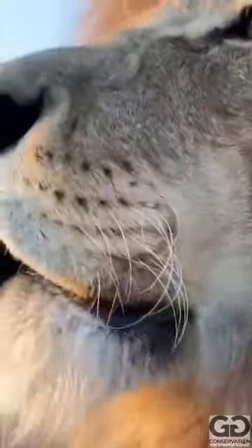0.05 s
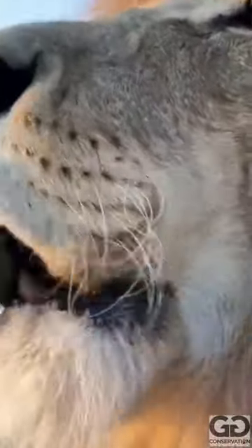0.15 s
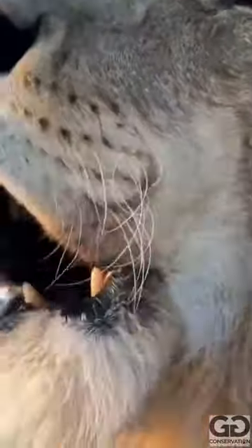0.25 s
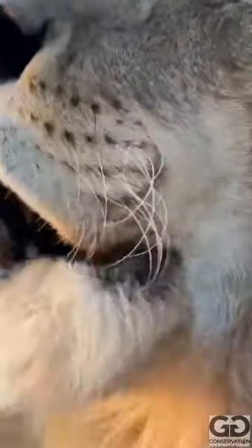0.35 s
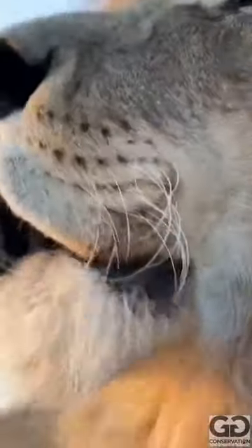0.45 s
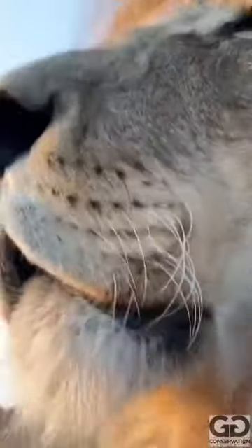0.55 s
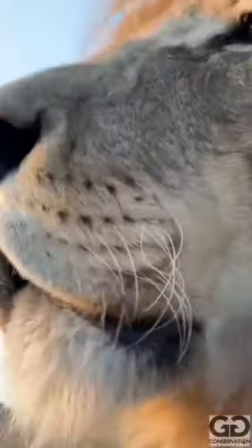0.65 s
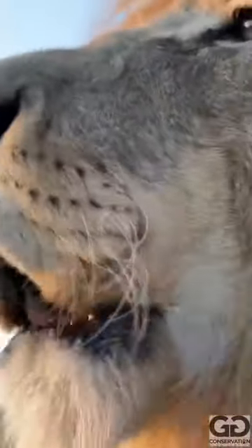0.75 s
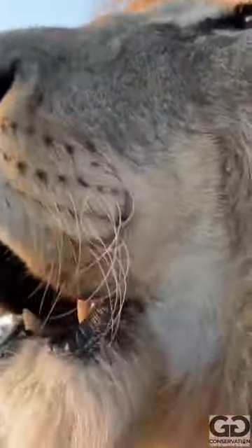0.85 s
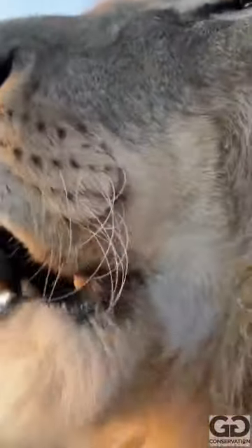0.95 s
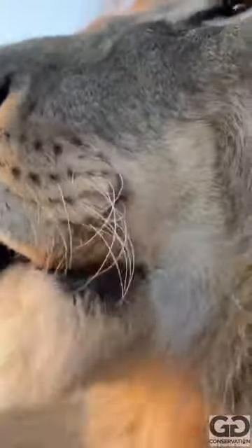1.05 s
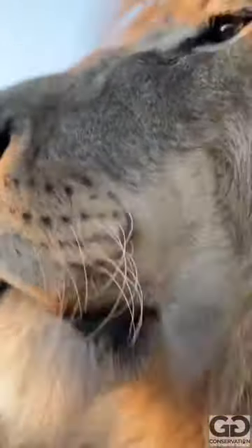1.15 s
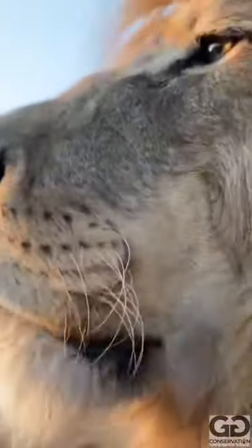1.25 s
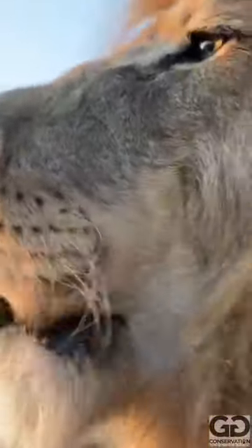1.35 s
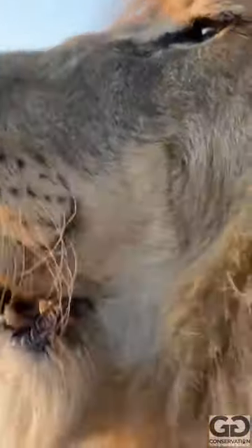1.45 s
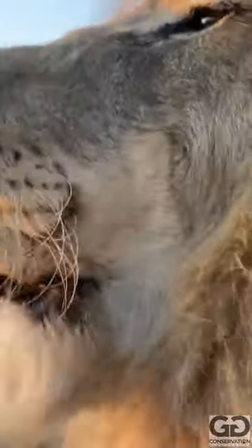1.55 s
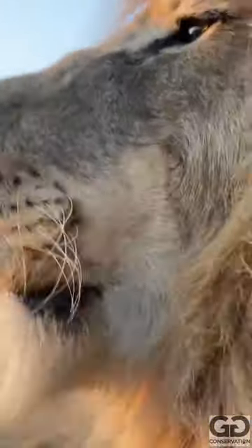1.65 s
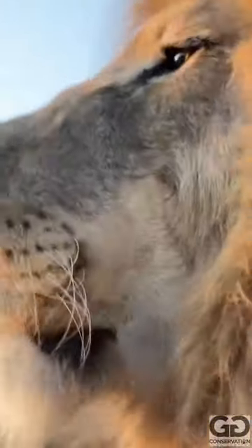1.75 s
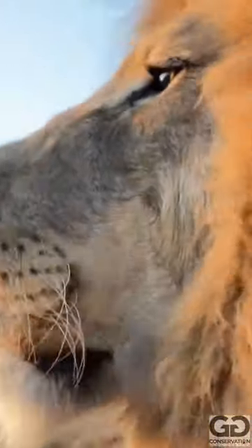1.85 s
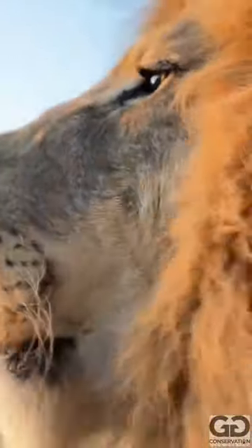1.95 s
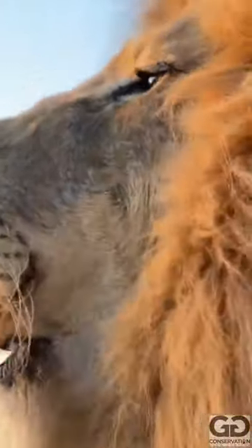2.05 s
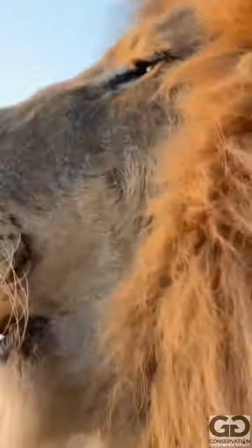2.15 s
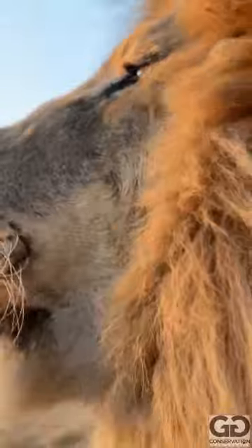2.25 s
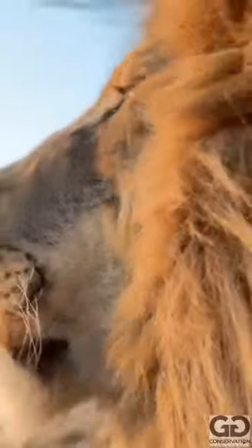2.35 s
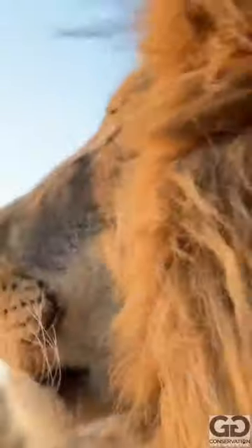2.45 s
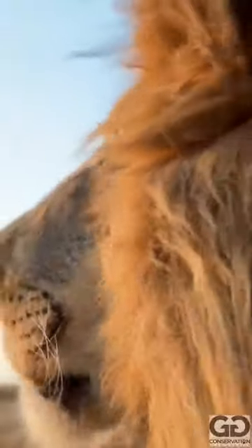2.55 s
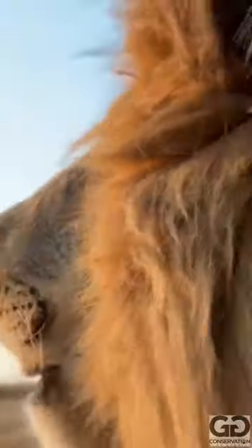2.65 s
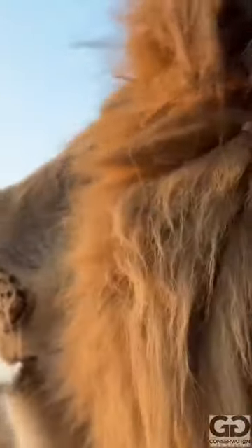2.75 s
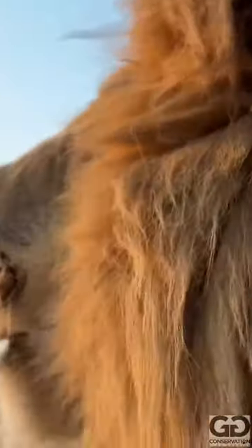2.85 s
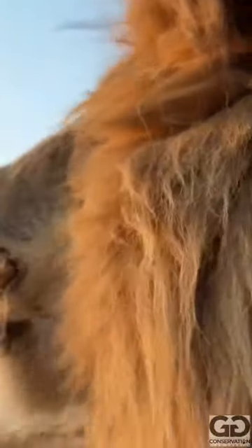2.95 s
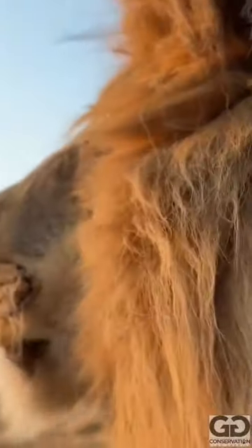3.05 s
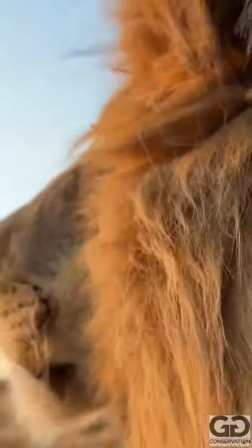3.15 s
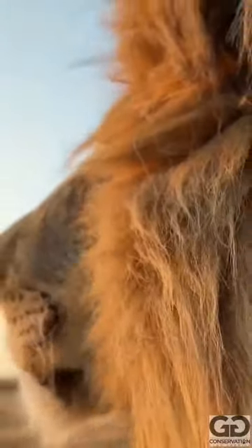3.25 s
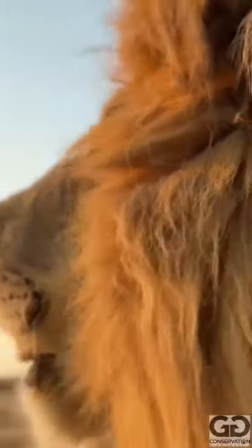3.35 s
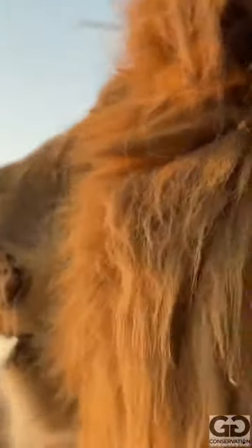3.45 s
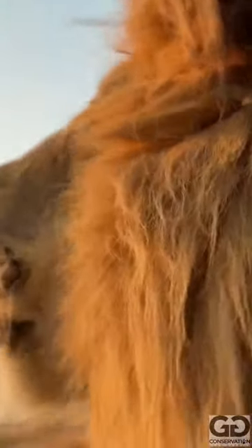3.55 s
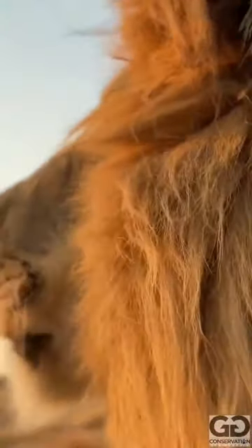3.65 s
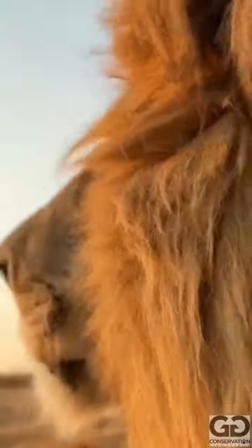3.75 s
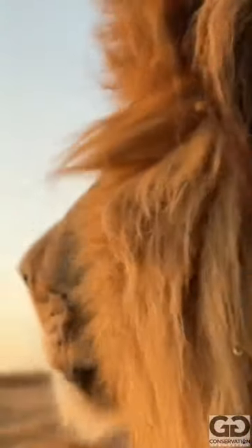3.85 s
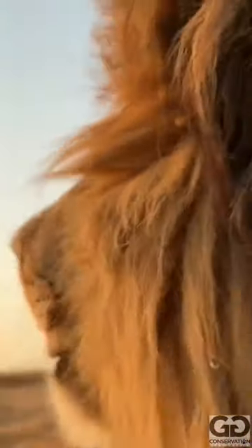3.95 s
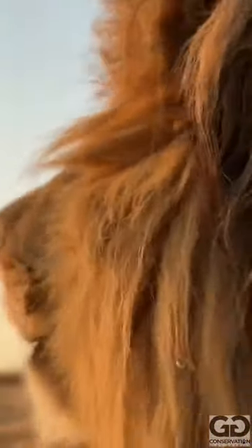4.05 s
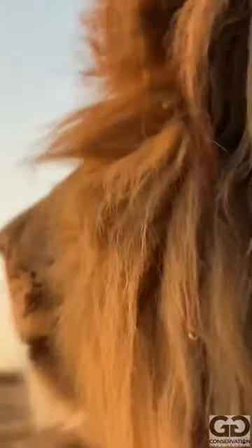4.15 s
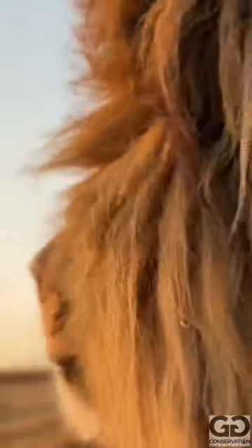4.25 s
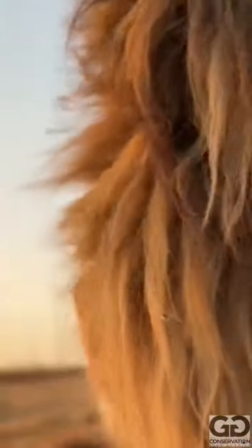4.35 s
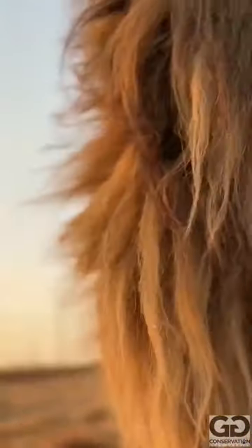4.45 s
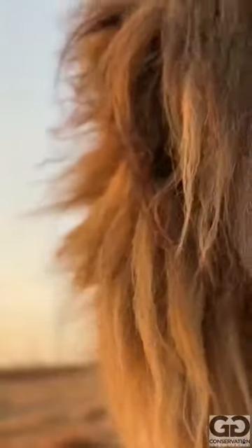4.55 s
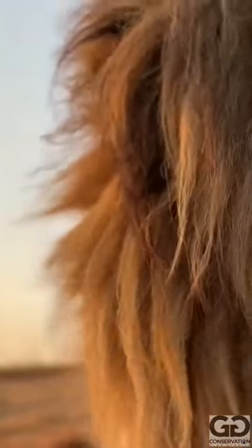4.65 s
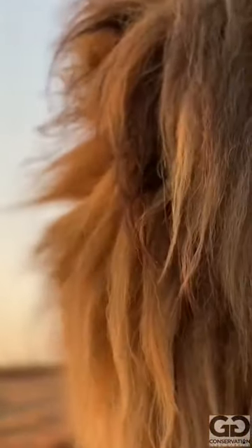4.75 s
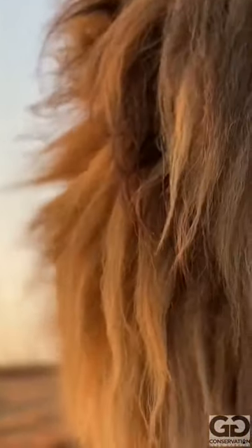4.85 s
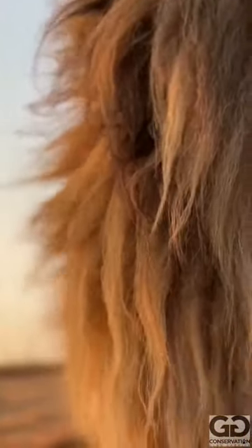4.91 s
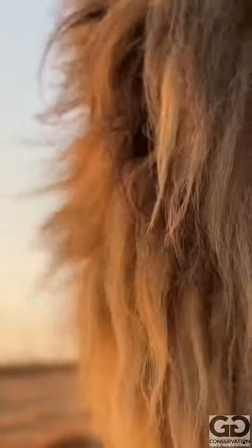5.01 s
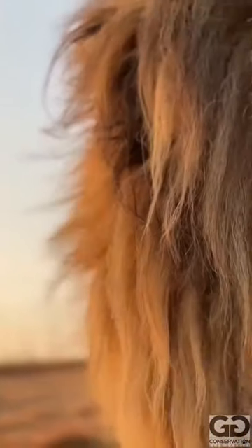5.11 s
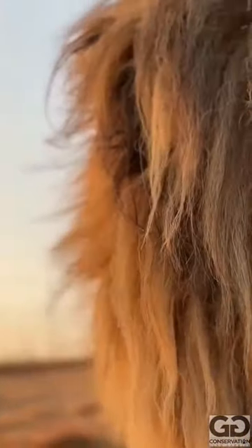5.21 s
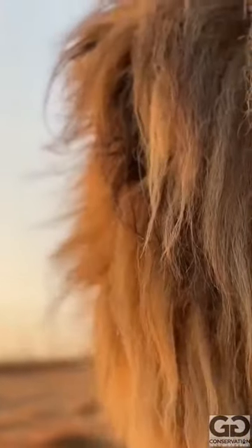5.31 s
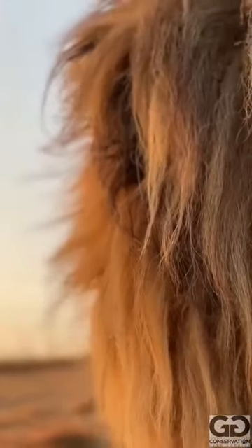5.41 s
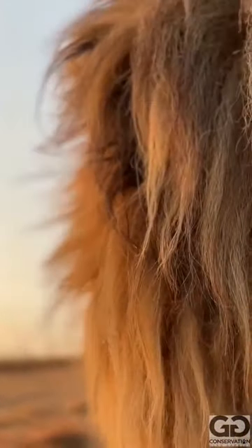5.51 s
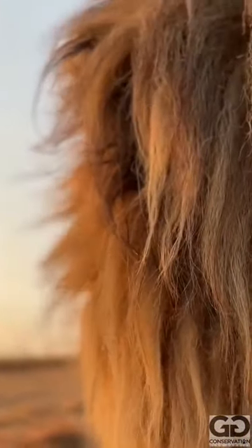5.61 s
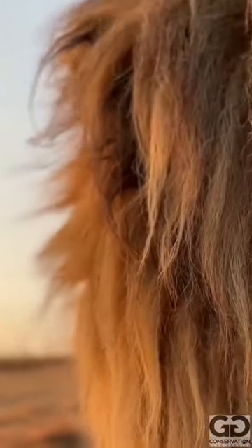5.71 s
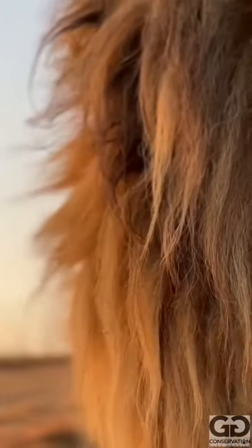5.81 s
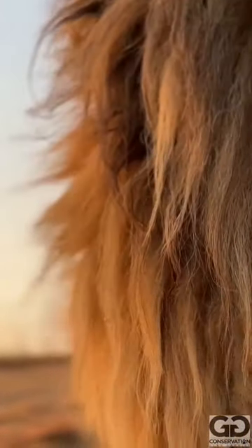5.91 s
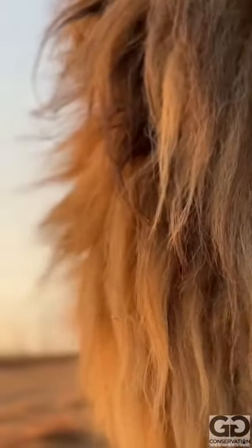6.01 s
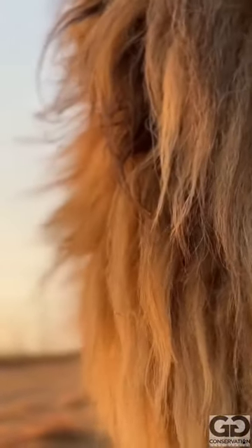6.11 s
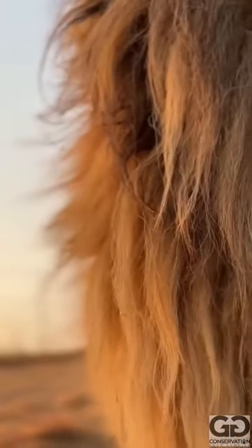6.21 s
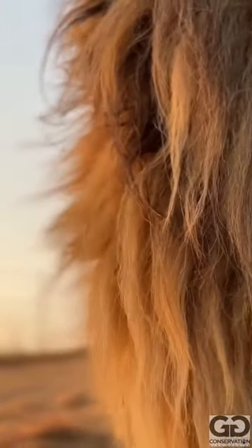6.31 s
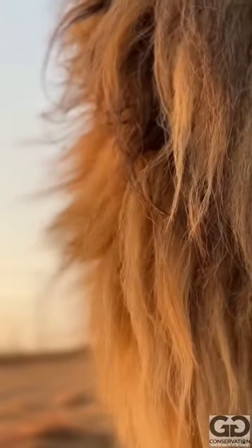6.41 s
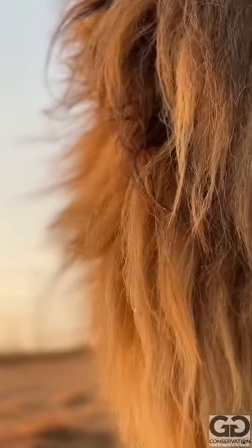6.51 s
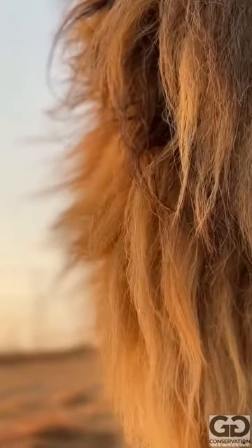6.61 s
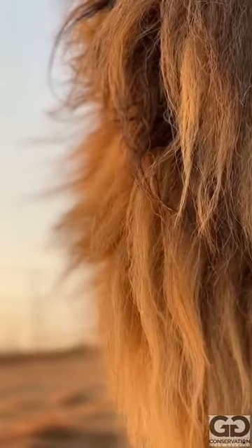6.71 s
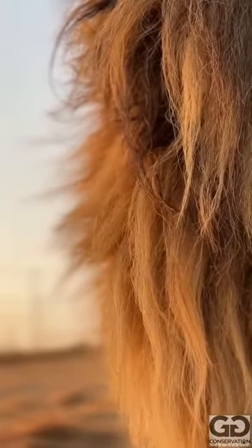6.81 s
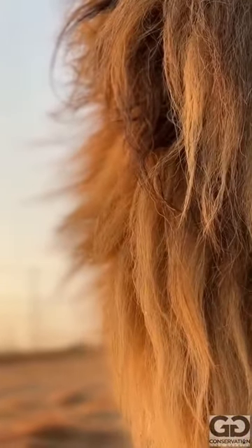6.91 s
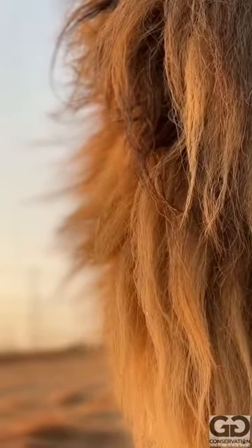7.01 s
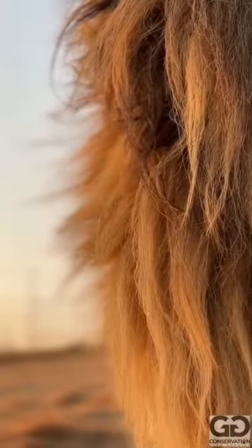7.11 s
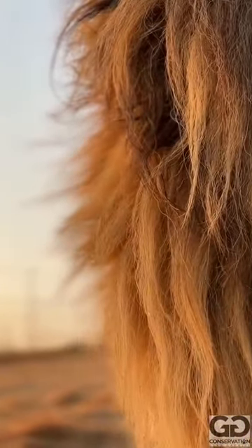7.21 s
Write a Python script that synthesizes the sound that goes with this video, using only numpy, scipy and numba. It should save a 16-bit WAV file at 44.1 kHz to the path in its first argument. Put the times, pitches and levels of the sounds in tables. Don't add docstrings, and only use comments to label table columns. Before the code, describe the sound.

A male lion very close gives ten deep, rough grunting roars with gasps between, then faint low moans far off on a quiet plain.

```python
import sys
import numpy as np
from scipy import signal
from scipy.fft import rfft, irfft, next_fast_len
from scipy.io import wavfile
from scipy.ndimage import uniform_filter1d, map_coordinates
from numba import njit

SR = 44100
rng = np.random.default_rng(int(sys.argv[2]) if len(sys.argv) > 2 else 0)


def digitize_waveform(pressure):
    field = np.atleast_2d(pressure).T
    bounded = np.clip(field, -1, 1)
    quanta = np.round(bounded * 32767).astype(np.int16)
    wavfile.write(sys.argv[1], SR, quanta)


def gain_from_db(level_db):
    decades = np.asarray(level_db, float) / 20
    return 10 ** decades


N = 320607


def unit(x):
    return x / np.sqrt(np.mean(x ** 2) + 1e-20)


def noise():
    return rng.standard_normal(N)


def curves(tables):
    t = np.arange(N) / SR
    s, *cols = np.transpose(np.concatenate(tables))
    gate = sum((t >= rows[0][0]) & (t < rows[-1][0]) for rows in tables)
    return [np.interp(t, s, c) for c in cols] + [uniform_filter1d(1. * gate, size=400, mode="nearest")]


def wobble(rate):
    knots = rng.standard_normal(int(N * rate / SR) + 4)
    return map_coordinates(knots, [np.arange(N) * rate / SR])


def filtered(x, response):
    m = next_fast_len(N + SR // 2)
    return irfft(rfft(x, m) * response(np.fft.rfftfreq(m, 1 / SR)), m)[:N]


def coloured(x, points):
    f, db = np.transpose(points)
    return unit(filtered(x, lambda hz: gain_from_db(np.interp(np.log(hz + 1), np.log(f), db, -120, -120))))


def resonant(x, modes):
    def response(f):
        total = 0
        for k, (c, w, db) in enumerate(modes):
            total = total + (-1) ** k * gain_from_db(db) * 1j * f * w / (c * c - f * f + 1j * f * w)
        return total
    return unit(filtered(x, response))


@njit
def follow(x, pole):
    y, state = np.zeros(len(x)), 0j
    for n in range(len(x)):
        state = state * pole[n] + x[n]
        y[n] = state.imag
    return y


def moving(x, hz, width_hz):
    return unit(follow(x, np.exp((2j * hz - width_hz) * np.pi / SR)))


# time in seconds, level in dB.
RUMBLE_LEVEL = [
    (0, -52.5),
    (.9, -61),
    (1.3, -62),
    (3, -60),
    (5.3, -57),
    (6.3, -54),
    (7.27, -59.5),
]
# frequency in Hz, level in dB.
RUMBLE_TONE = [(15, -36.5), (25, 1.5), (76, 12), (131, 2), (246, -26.5), (379, -42), (454, -21.5),
               (653, -35), (700, -16), (910, -57), (1540, -120)]
# frequency in Hz, level in dB.
AIR_TONE = [(120, -37), (200, -8.5), (327, -7.5), (392, -14.5), (487, -23.5), (1060, -23.5), (2010, -32),
            (2640, -38.5), (3000, -35), (15400, -61)]


def plain():
    level_db, _ = curves([RUMBLE_LEVEL])
    hum = moving(noise(), np.full(N, 115.), width_hz=11)
    rumble = gain_from_db(level_db + 2.1 * wobble(6)) * (coloured(noise(), RUMBLE_TONE) + 0.33 * hum)
    lift_db = np.interp(np.arange(N) / SR, [0, 6.1, 6.5, 7.15, 7.27], [-76.0, -75.0, -72, -68.0, -67.5])
    return rumble + gain_from_db(lift_db + 1.2 * wobble(14)) * coloured(noise(), AIR_TONE)


# start in seconds, length in seconds, chest level in dB, throat level in dB, pitch in Hz.
GRUNTS = [
    (-.24, 0.36, -8, -8, 116),
    (0.336, 0.34, -10, -13, 114),
    (0.947, 0.35, -10, -15, 114),
    (1.557, 0.33, -11, -11.5, 119),
    (2.172, 0.37, -11.5, -16, 121),
    (2.873, 0.43, -9, -16.5, 117),
    (3.535, .365, -6, -13, 110),
    (4.133, 0.33, -9, -15, 109),
    (4.834, 0.41, -8.5, -15, 106),
    (5.812, 0.54, -8, -13, 97.9),
]
# time in seconds, throat peak in dB, jaw ring in Hz.
BREAKS = [
    (.035, -39.5, 1120),
    (.463, -5.5, 1120),
    (1.082, -3, 1110),
    (1.665, -5, 855),
    (2.308, -7, 1117),
    (3.033, -6, 1076),
    (3.653, -5, 1113),
    (4.235, -3.5, 743.5),
    (4.996, -9.5, 949),
    (5.904, -3.5, 775),
]
FULL_S, SAG_AT = .07, .68


def falter_lead(s):
    return 0.021 + 0.00078 * s


def effort():
    tables = []
    for (s, length, chest_db, throat_db, _), (break_s, *_) in zip(GRUNTS, BREAKS):
        hold_s = np.clip(break_s - 0.021 - s, FULL_S + .005, length / 2)
        times = s + np.array([0, 0.036, FULL_S, hold_s, SAG_AT * length, length])
        rise = np.array([-24.5, -5, 0, 0, 0, 0])
        fall = np.array([0, 0, 0, 0, -12.5, -54])
        throat = throat_db + rise
        mouth = throat - 7.5 - 0.34 * s + 2.2 * fall
        rasp = throat - 17 - 1.41 * s + 1.65 * fall
        tables.append(np.transpose([times, chest_db + rise + fall, throat + 2 * fall, mouth, rasp]))
    return curves(tables)


THROAT_HZ = (368.6, 408.2, 352, 303)


def tract():
    tables = []
    for s, length, *_, hz in GRUNTS:
        times = s + np.array([0, FULL_S, SAG_AT * length, length])
        tables.append(np.transpose([times, hz * np.array([.93, 1, 1.01, .98]), THROAT_HZ]))
    return curves(tables)[:2]


# frequency in Hz, width in Hz, level in dB.
MOUTH = [(744, 20, -2.5), (861, 72, 1), (988.6, 48, 1.5), (1110, 60, 2), (1276, 58, -6)]
# frequency in Hz, level in dB.
RASP_TONE = [(760, -34.5), (1300, -3), (1550, -7.5), (1850, -6), (2440, -7.5), (3230, -12), (3970, -19),
             (4790, -21.5), (5710, -19), (6070, -20.5), (9090, -28.5), (11800, -26.5), (15400, -48)]


def buzz():
    chest_db, throat_db, mouth_db, rasp_db, gate = effort()
    pitch, throat_hz = tract()
    t = np.arange(N) / SR
    turns = np.cumsum(pitch * (1 + .05 * wobble(70))) / SR
    closing = np.diff(np.floor(turns), prepend=0)
    pulses = unit(closing * gain_from_db(1.1 * noise()))
    puff = 0.58 + np.exp(-3.2 * (turns % 1))

    def air():
        return unit(puff * noise())

    tone = np.sqrt(2) * np.sin(2 * np.pi * turns) * gain_from_db(2.2 * wobble(43))
    flutter = coloured(noise(), [(25, -20.0), (45, -6.0), (70, -1.5), (140, -1.0), (200, -12), (260, -18.5),
                                 (330, -50.5)])
    uneven = np.sin(3 * np.pi * turns) * wobble(25)
    chest = tone + gain_from_db(-17) * uneven + gain_from_db(-8) * flutter

    slack = np.zeros(N)
    for (break_s, *_), (s, length, *_) in zip(BREAKS, GRUNTS):
        slack += (t > break_s - falter_lead(break_s)) & (t < s + length)
    slack = uniform_filter1d(slack, size=700)
    gape = sum(np.exp(-((t - s + 0.0061) / 0.0021) ** 2) for s, *_ in slap_rows())

    drive = pulses + 0.8 * air()
    throat = moving(drive, throat_hz, width_hz=60)
    throat = throat + gain_from_db(-3 - 3.5 * slack) * moving(drive, 1.1 * throat_hz, width_hz=110)
    throat = throat + gain_from_db(-13.5) * moving(drive, 1.44 * throat_hz, width_hz=70)
    throat = unit(filtered(throat, lambda f: (1j * f / (150 + 1j * f)) ** 2 * 900 / (900 + 1j * f)))
    mouth = resonant(pulses + 0.5 * air(), MOUTH)
    rasp = coloured(air() + 0.079 * pulses, RASP_TONE) * gain_from_db(2.0 * wobble(35))

    voiced = gain_from_db(chest_db - 6.3 * slack) * chest
    voiced = voiced + gain_from_db(throat_db - 6.4 * slack) * throat
    voiced = voiced + gain_from_db(mouth_db - 14 * slack) * mouth
    gate = gate * gain_from_db(-9 * gape * slack)
    return gate * voiced, gate * gain_from_db(rasp_db + 1.5 - 2.8 * slack) * rasp


# time in seconds, treble corner in Hz.
HEAD_TURN = [
    (0, 16300),
    (3, 8980),
    (6.298, 5510),
]


def turned(x, blotch_db):
    s, hz = np.transpose(HEAD_TURN)
    f, t, z = signal.stft(x, SR, nperseg=1024, noverlap=768)
    f = f[:, None]
    blotches = uniform_filter1d(rng.standard_normal(z.shape), size=3, axis=0)
    blotches = unit(uniform_filter1d(blotches, size=9, axis=1))
    z = z * gain_from_db(blotch_db * blotches - 0.1 * blotch_db ** 2)
    z = z / (1 + (f / np.interp(t, s, hz)) ** 2)
    z = z * gain_from_db(-1.5 * t * np.exp(-((f - 1620) / 170) ** 2))
    return signal.istft(z, SR, nperseg=1024, noverlap=768)[1][:N]


def muffled(x, hz):
    return filtered(x, lambda f: 1 / (1 - (f / hz) ** 2 + 1.3j * f / hz) ** 2)


# time in seconds, throat peak in dB, jaw ring in Hz.
SLAPS = [(0.347, -17.5, 1106), (.368, -8, 1127), (.493, -10.5, 852), (.955, -21, 1098), (.987, -9.5, 1110),
         (1.058, -8.5, 724), (1.562, -21.5, 812), (1.582, -10.5, 1148), (1.644, -5.5, 861),
         (1.693, -7.5, 1148), (2.176, -22.5, 684.5), (2.238, -2.5, 1110), (2.283, -2.5, 871),
         (2.876, -20.5, 682.4), (2.926, -12, 857), (3.551, -17, 1054), (4.138, -21, 1190),
         (4.163, -17.5, 738), (4.185, -16.5, 730), (4.26, -9, 720), (4.843, -16.5, 876), (4.887, -7, 910),
         (5.02, -6.5, 923), (5.811, -25, 824), (5.845, -14.5, 833), (5.867, -1, 940), (5.949, -6, 909),
         (5.972, -2, 968), (5.994, 0.5, 754), (6.072, -8, 932),
         (.557, -28.5, 925), (.607, -45.5, 988), (1.107, -13, 888), (1.141, -17.5, 875), (1.173, -19, 904),
        (1.219, -44, 1002), (1.751, -20, 1062), (1.784, -31, 906), (1.84, -50.5, 972.7),
        (2.371, -24.5, 836), (2.405, -28.5, 980), (2.453, -48.5, 972.6), (3.064, -15, 692.3),
        (3.129, -21, 740), (3.714, -26.5, 697), (3.753, -26.5, 1063), (3.796, -36.5, 956), (4.33, -25, 691),
        (4.369, -35, 993.6), (5.052, -15.5, 991), (5.139, -33, 712), (6.045, -10, 912), (6.106, -18.5, 825),
        (6.178, -25.5, 880), (6.218, -35, 883)]


def slap_rows():
    s, db, jaw_hz = np.transpose(sorted(BREAKS + SLAPS))
    starts = np.transpose(GRUNTS)[0]
    grunt = np.searchsorted(starts, s) - 1
    age = s - starts[grunt]
    buzzing = s < np.transpose(BREAKS)[0][grunt]
    chest_db = -5 - .5 * db - 7.5 * buzzing * (age > 0.036)
    mouth_db = -1 - 9 * np.minimum(age / 0.12, 1) - 0.85 * s
    rasp_db = -21.5 - 1.83 * s - 0.25 * db
    return np.transpose([s, db, chest_db, mouth_db, rasp_db, jaw_hz])


def slaps():
    (pitch, throat_hz), rows = tract(), slap_rows()
    rings, puffs, t = np.zeros(N + SR), np.zeros(N + SR), np.arange(SR // 5) / SR

    def ring(hz, t60, bend):
        swell = 1 - np.exp(-t / 0.0024)
        return gain_from_db(-60 * t / t60) * swell * np.sin(2 * np.pi * hz * t * (1 + bend * t))

    chance = rng.standard_normal((len(rows), 16))
    for (s, db, chest_db, mouth_db, rasp_db, jaw_hz), luck in zip(rows, chance):
        n = round(s * SR)
        end = n + len(t)
        chest = gain_from_db(chest_db) * ring(pitch[n] * (1 + luck[0] / 20), 0.17, -0.91)
        throat = ring(1.02 * throat_hz[n], .13, -1.1)
        throat = throat + gain_from_db(-10 + .2 * db + 4.2 * luck[2]) * ring(1.43 * throat_hz[n], 0.057, 0.98)
        throat = throat + gain_from_db(-14 - .3 * db + 1.8 * luck[15]) * ring(0.92 * throat_hz[n], 0.11, 0.63)
        mouth = np.zeros(len(t))
        for k, (hz, width, level) in enumerate(MOUTH):
            mouth += gain_from_db(level + 4 * luck[3 + k]) * ring(hz * (1 + .04 * luck[9 + k]), 3.9 / width, .8)
        jaw = ring(jaw_hz, 0.13, np.interp(s, [3, 5], [.4, 1.5]))
        rings[n - 350:n] *= np.linspace(1, .35, 350)
        rings[n:end] *= .35
        rings[n:end] += gain_from_db(db) * (chest + throat + gain_from_db(mouth_db - 9.0) * mouth + gain_from_db(mouth_db - 4.5) * jaw)
        crack = gain_from_db(0.5 + 4 * luck[1] - 60 * t / 0.0017)
        puff = gain_from_db(-60 * t / 0.045) + 0.99 * gain_from_db(-60 * t / 0.14)
        puffs[n:end] += gain_from_db(db + rasp_db - 6.5) * (crack + puff)
    return rings[:N], puffs[:N] * coloured(noise(), RASP_TONE)


# start in seconds, loudest moment in seconds, end in seconds, level in dB.
GASPS = [
    (0.151, 0.251, 0.34, -43),
    (0.756, .895, .93, -43),
    (1.394, 1.496, 1.553, -45.5),
    (1.985, 2.104, 2.19, -44.5),
    (2.672, 2.806, 3.02, -46.5),
    (3.35, 3.488, 3.62, -50.5),
    (3.995, 4.083, 4.125, -44),
    (4.619, 4.76, 5.19, -47),
    (5.5, 5.6, 5.64, -52),
    (5.64, 5.72, 5.78, -51),
]


def breath():
    tables = []
    for *times, db in GASPS:
        low = db + np.array([-30, 0, -13])
        high = db - 13.5 + np.array([-18.5, 0, -27]) - 0.5 * times[0]
        tables.append(np.transpose([times, low, high]))
    return curves(tables)


# frequency in Hz, width in Hz, level in dB.
GASP_THROAT = [(128.9, 81, 1.5), (402, 72, 1.2), (584, 95, -3.5), (904, 130, -3.5), (1162, 200, -7)]
# frequency in Hz, level in dB.
GASP_HISS = [(760, -28), (1300, 5.5), (1640, -4), (1950, 1), (2660, -4.5), (3140, -5), (4500, -17),
             (5850, -31), (13000, -50)]


def gasps():
    low_db, high_db, gate = breath()
    flutter = gain_from_db(1.9 * wobble(39))
    rush = resonant(resonant(noise(), GASP_THROAT), GASP_THROAT)
    low = gain_from_db(low_db + 3.0) * rush
    return gate * flutter * (low + gain_from_db(high_db) * coloured(noise(), GASP_HISS))


# time in seconds, pitch in Hz, level in dB.
MOAN = [
    (6.25, 114.2, -29),
    (6.278, 103.9, -41),
    (6.42, 118.6, -44.5),
    (6.75, 128.9, -40),
    (6.9, 126, -44),
    (7.22, 129, -47.5),
    (7.27, 125, -47.5),
]
# time in seconds, pitch in Hz, level in dB.
ANSWER = [
    (6.45, 155.6, -54),
    (6.536, 168.8, -64.5),
    (6.79, 172.2, -62),
    (6.93, 164.3, -50.5),
    (7.222, 151.7, -41),
    (7.27, 160.4, -43.5),
]


def moan(rows, second_db):
    pitch, level_db, gate = curves([rows])
    phase = 2 * np.pi * np.cumsum(pitch * (1 + 0.0094 * wobble(9.4))) / SR
    tone = np.sin(phase) + gain_from_db(second_db + 4.5 * wobble(14)) * np.sin(2 * phase)
    return gate * np.sqrt(2) * gain_from_db(level_db + 1.0 * wobble(12.0)) * tone


def scene():
    voice, rasp = buzz()
    rings, puffs = slaps()
    lion = muffled(voice + rings, hz=1490) + turned(rasp + puffs, blotch_db=4.5) + gasps()
    far = moan(MOAN, second_db=-45.0) + moan(ANSWER, second_db=-28.5)
    return (lion + far + plain())[None]


def top_cut(x):
    return signal.sosfilt(signal.butter(12, 15550, fs=SR, output="sos"), x)


def record(dry):
    def colour(f):
        return (1j * f / (33 + 1j * f)) ** 2 * np.where(f > 13100, gain_from_db(-7), 1)
    hiss = gain_from_db(-97) * coloured(noise(), [(3000, -8), (8000, 1.5), (15000, 2.0)])
    x = filtered(dry[0], colour) + hiss
    x = x / (1 + np.abs(x / .97) ** 8) ** (1 / 8)
    return top_cut(x[None])


dry = scene()
out = record(dry)
digitize_waveform(out)
```